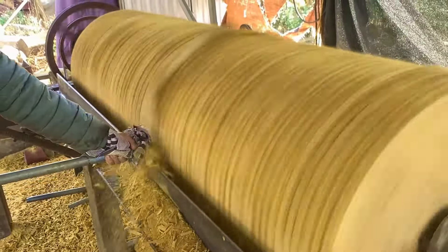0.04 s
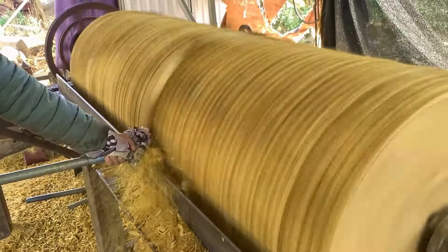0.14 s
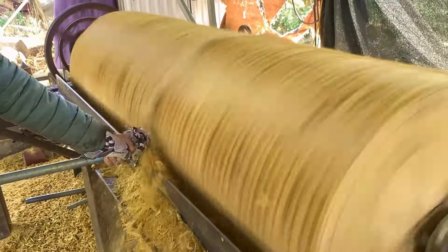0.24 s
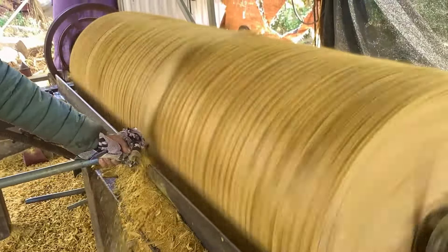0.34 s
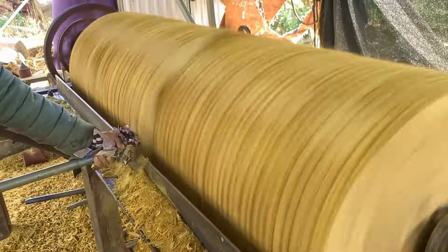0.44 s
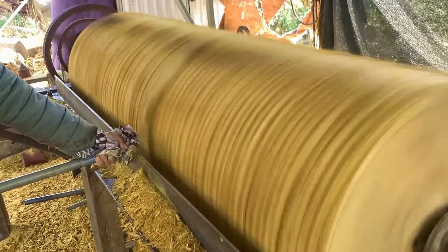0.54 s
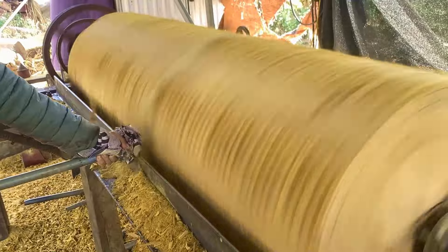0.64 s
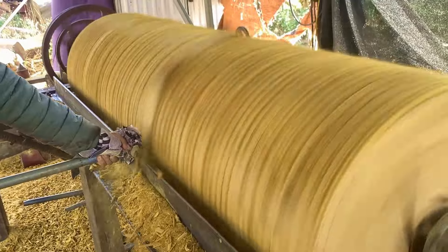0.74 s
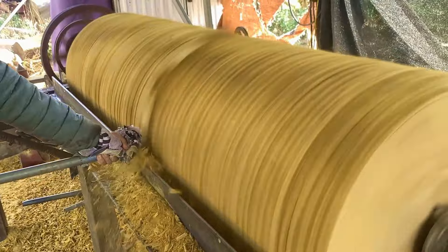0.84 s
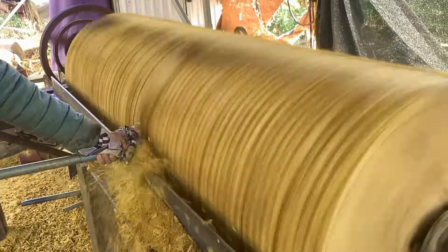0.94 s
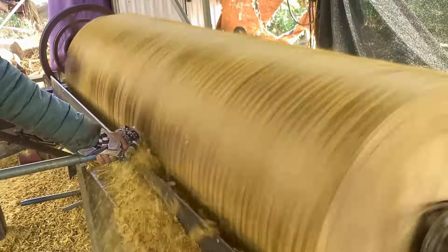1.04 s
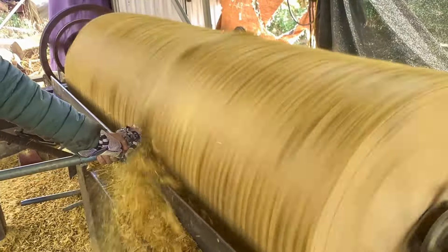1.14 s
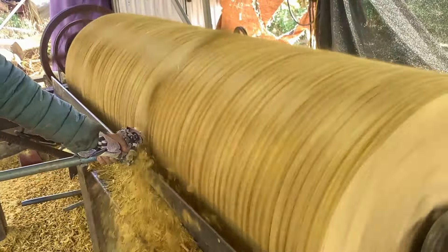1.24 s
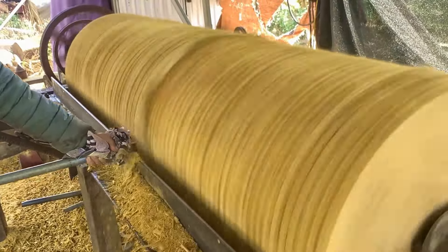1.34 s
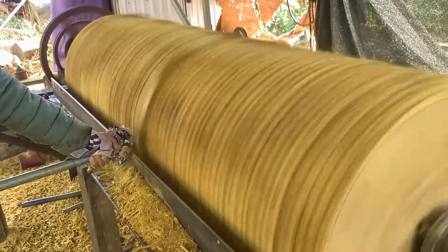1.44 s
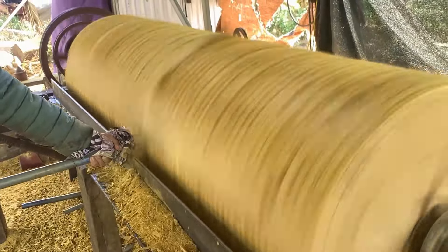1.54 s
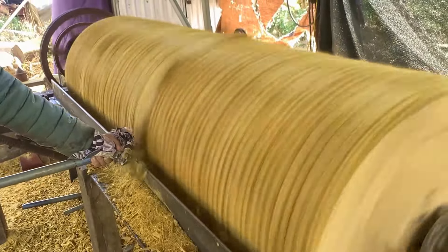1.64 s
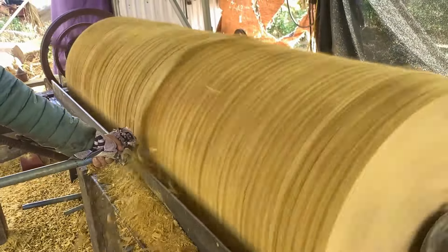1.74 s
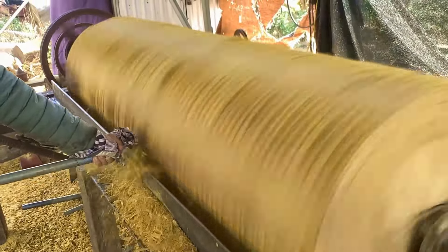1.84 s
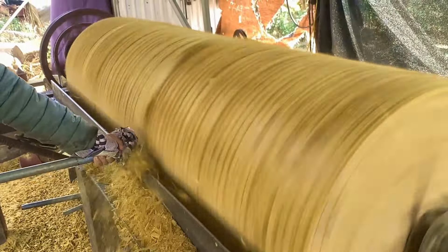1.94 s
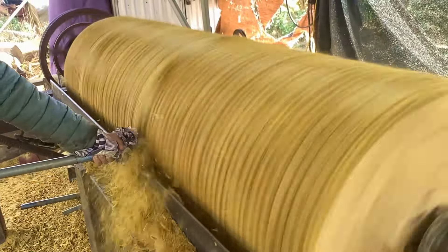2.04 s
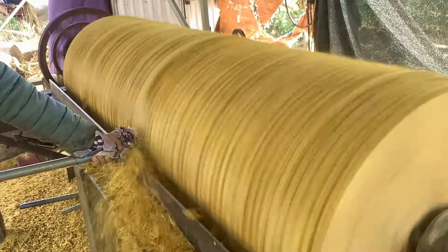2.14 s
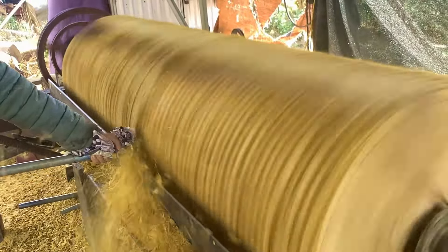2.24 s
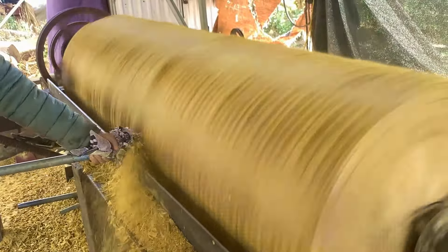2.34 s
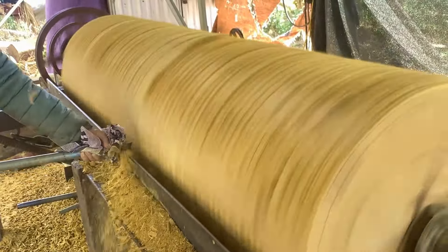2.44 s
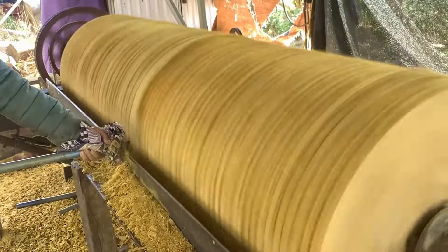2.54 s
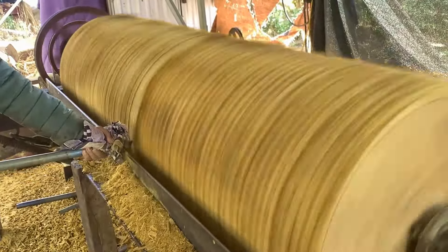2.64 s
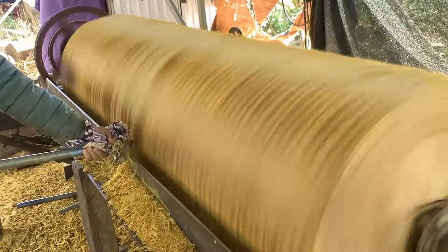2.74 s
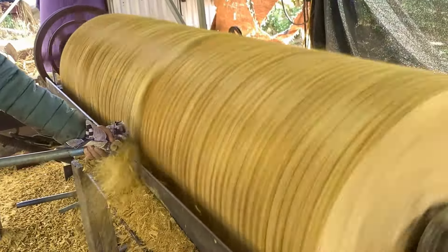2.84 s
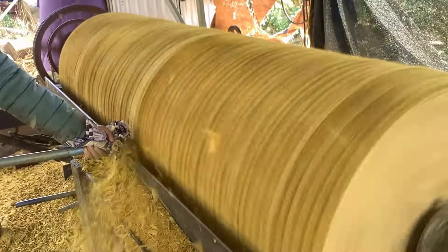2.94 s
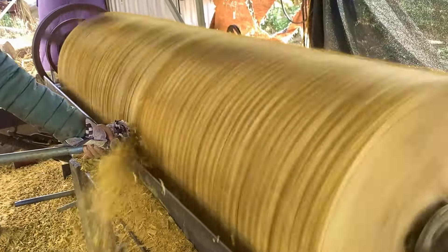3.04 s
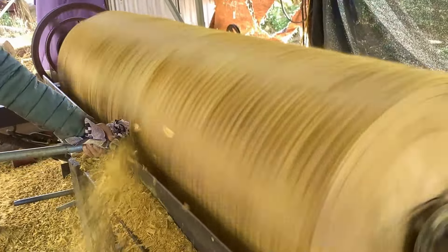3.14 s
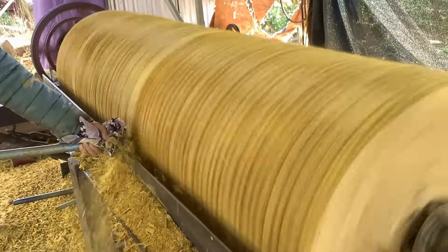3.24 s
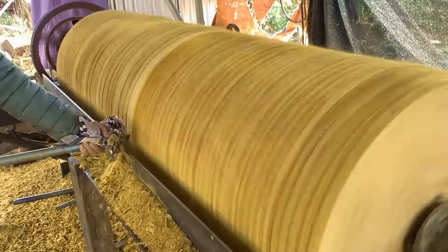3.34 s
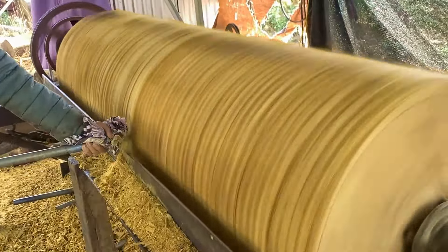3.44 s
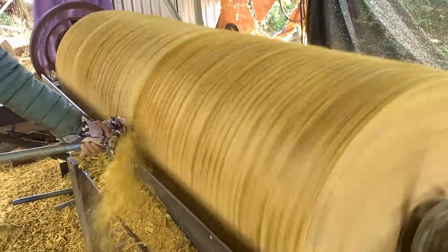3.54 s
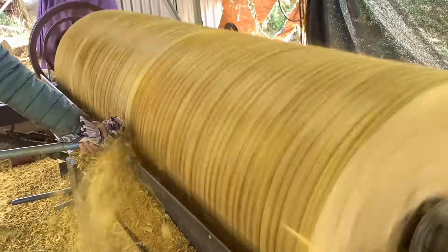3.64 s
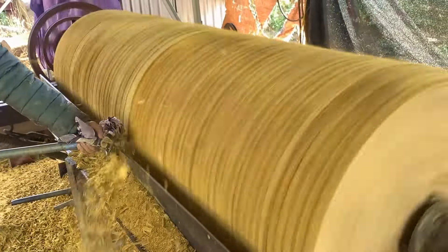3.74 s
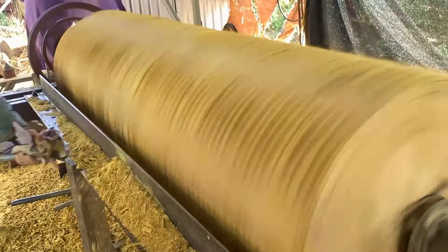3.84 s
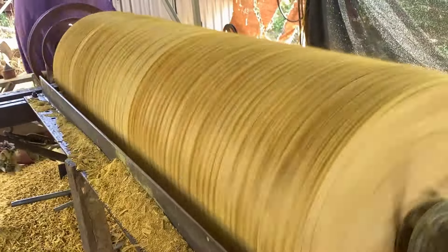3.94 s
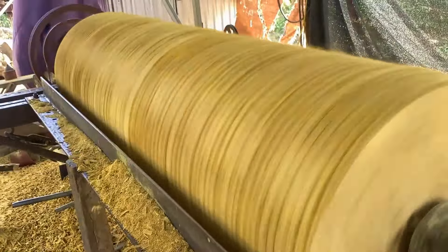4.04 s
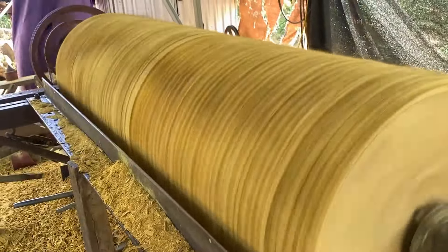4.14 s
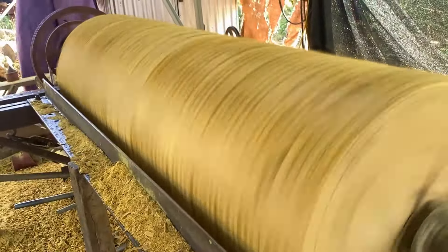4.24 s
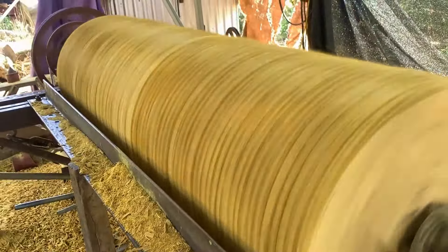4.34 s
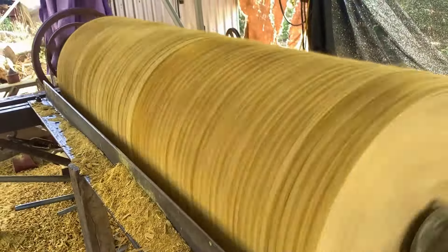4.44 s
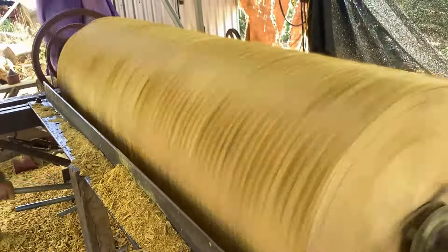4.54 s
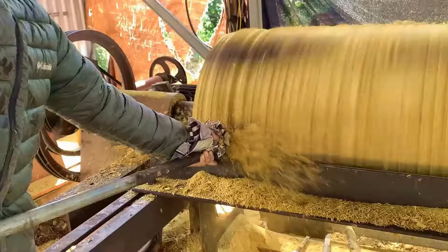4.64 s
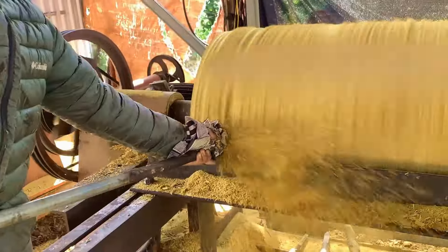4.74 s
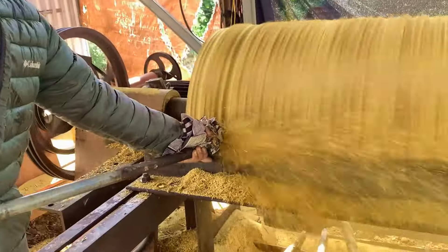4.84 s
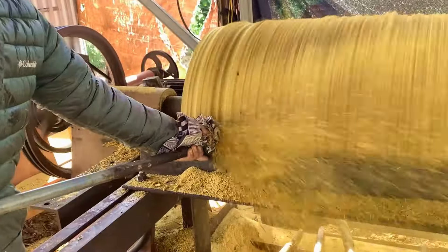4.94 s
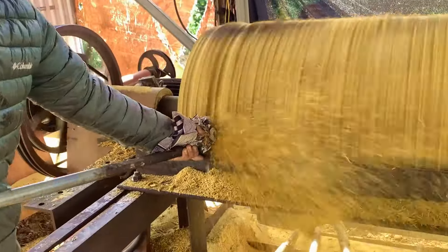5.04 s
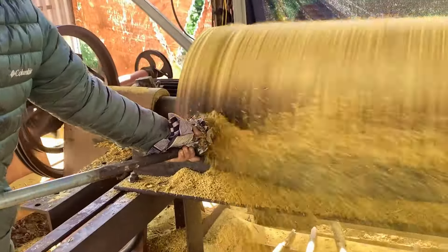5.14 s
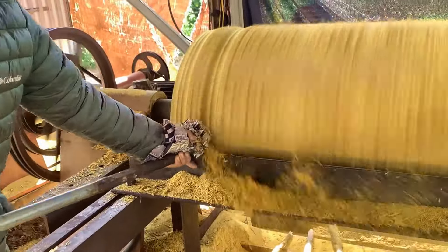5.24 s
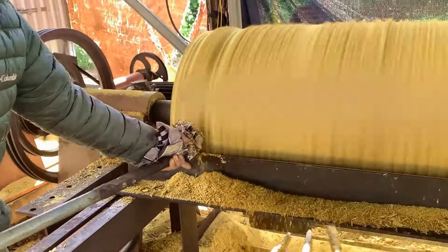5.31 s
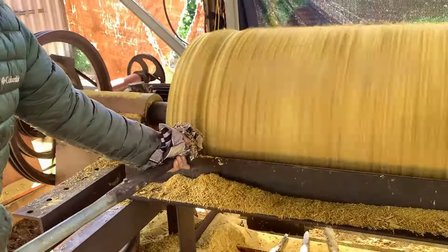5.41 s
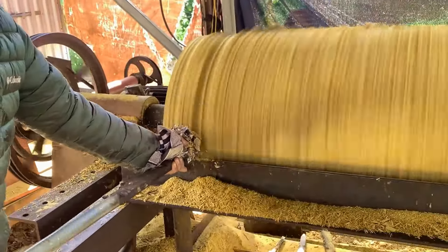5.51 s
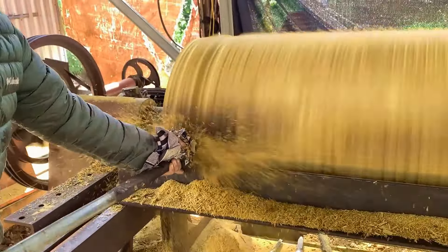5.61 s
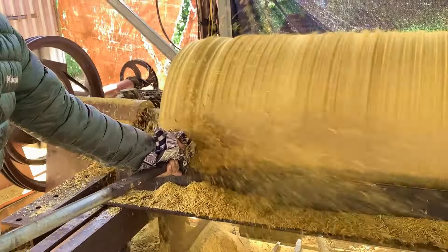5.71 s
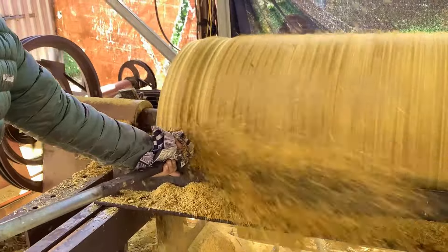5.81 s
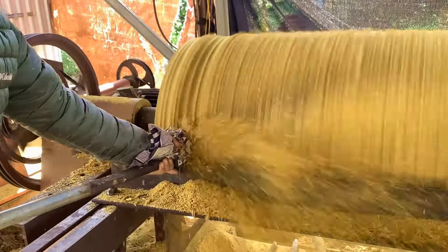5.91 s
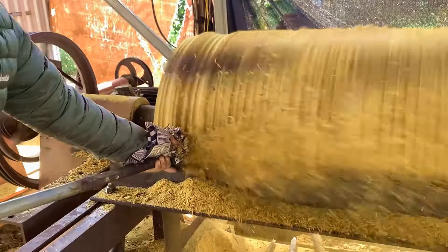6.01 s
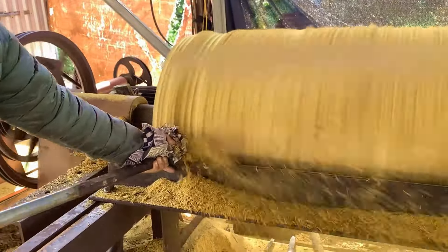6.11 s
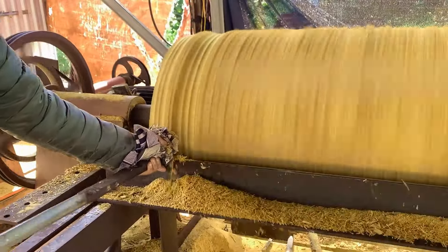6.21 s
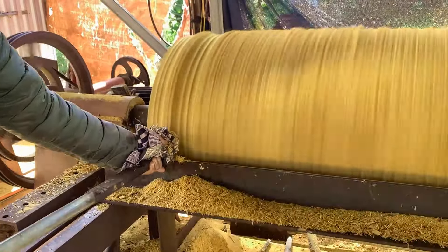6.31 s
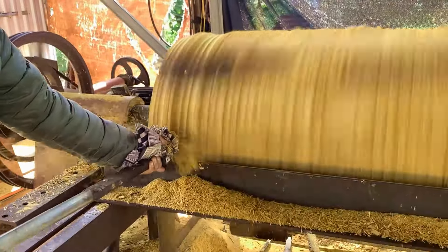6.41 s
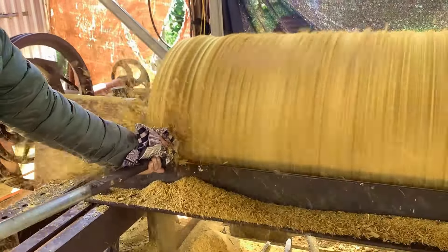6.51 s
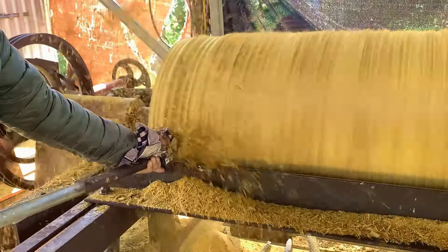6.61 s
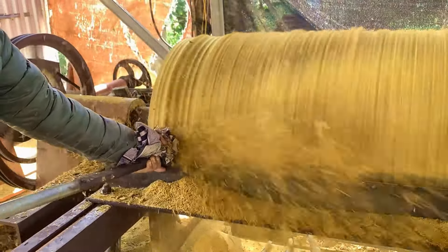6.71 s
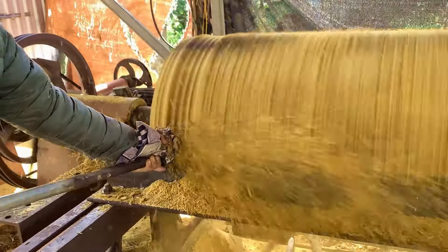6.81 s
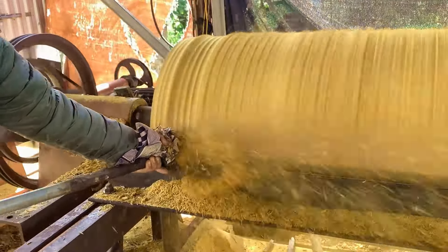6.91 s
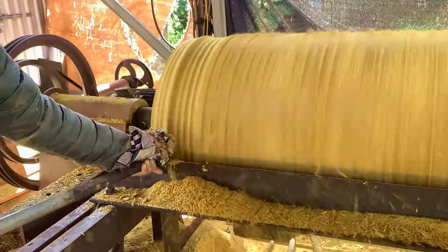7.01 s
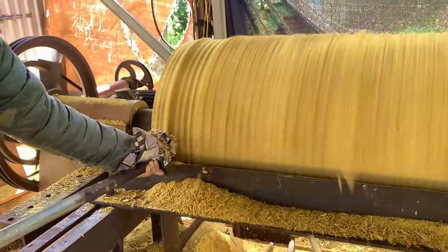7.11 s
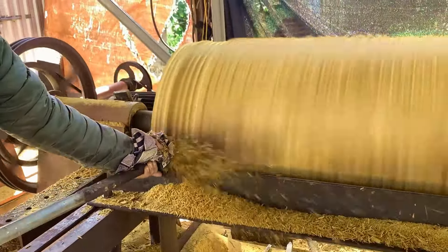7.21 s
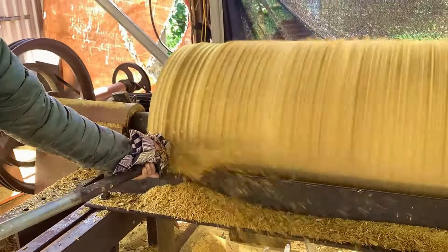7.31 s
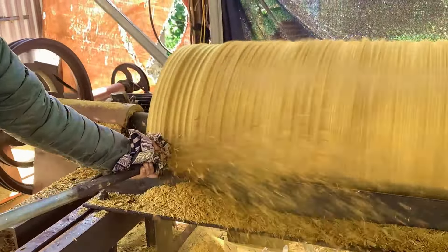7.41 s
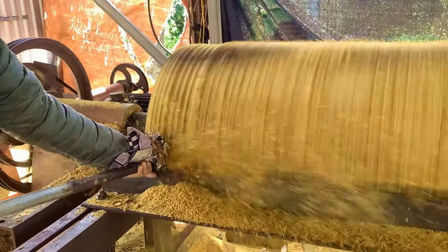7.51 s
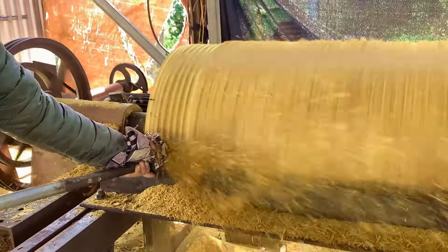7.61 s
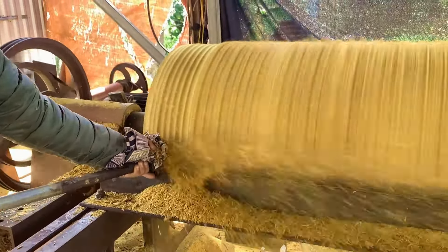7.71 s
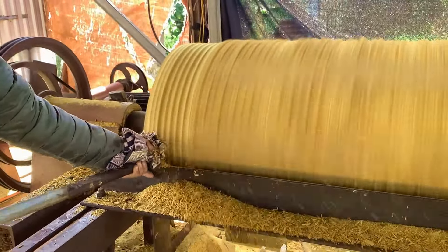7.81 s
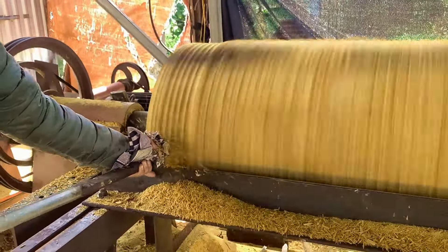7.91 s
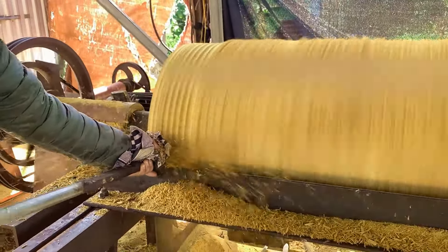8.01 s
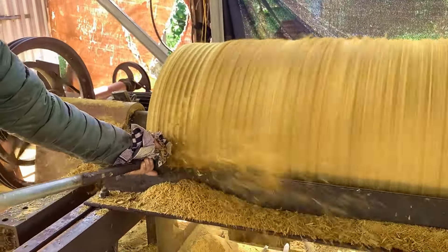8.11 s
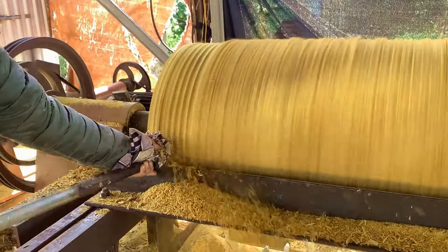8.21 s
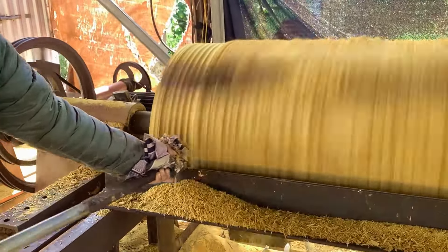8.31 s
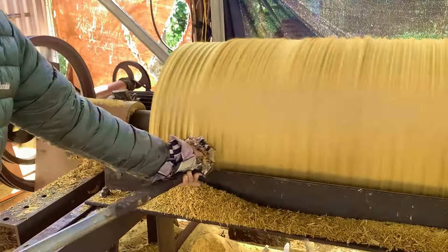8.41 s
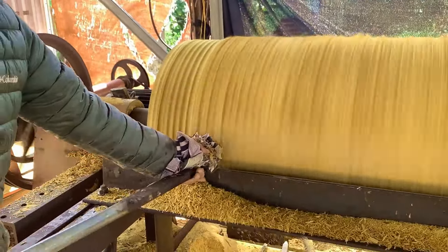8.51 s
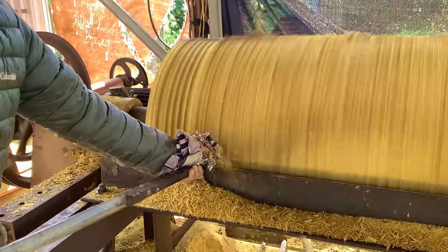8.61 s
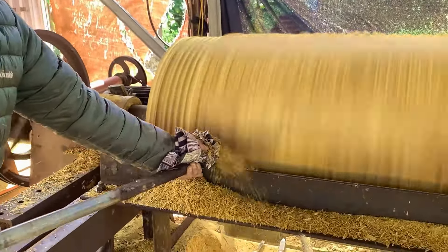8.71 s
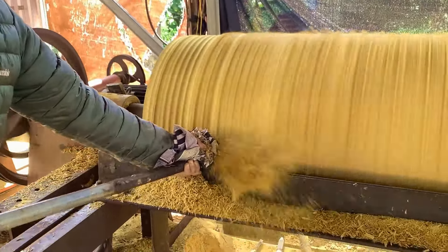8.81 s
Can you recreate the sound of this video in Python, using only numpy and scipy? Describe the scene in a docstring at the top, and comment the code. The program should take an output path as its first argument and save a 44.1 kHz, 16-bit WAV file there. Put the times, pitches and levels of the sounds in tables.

```python
"""Log on a lathe

A big log turns in an open shed while a hand-held tool is pushed against it in repeated rasping passes.
Random fibre snaps, scaled by each push, drive resonances of tool, rest and bed; noise and tones make the lathe.
It is heard from the end of the log, then abruptly from its side, where a high spot knocks once a turn."""
import sys
import numpy as np
from scipy import signal
from scipy.fft import rfft, irfft
from scipy.io import wavfile

SR = 44100
rng = np.random.default_rng(int(sys.argv[2]) if len(sys.argv) > 2 else 0)


def bounce(signal):
    """Save signal as a 16-bit WAV file at the path given by the first command-line argument."""
    frames = np.transpose(np.atleast_2d(signal))
    limited = np.clip(frames, -1, 1)
    pcm = np.round(limited * 32767).astype(np.int16)
    wavfile.write(sys.argv[1], SR, pcm)


N = 390726

VIEW_CHANGE_S = 4.725
TAPS = 16384
HZ = np.maximum(np.fft.rfftfreq(TAPS, 1 / SR), 1)
TIME = np.arange(N) / SR


def from_db(db):
    """Amplitude ratio of a level in dB."""
    return 10 ** (np.asarray(db) / 20)


def rms_one(x):
    """Scale to unit RMS."""
    return x / np.sqrt(np.mean(x ** 2) + 1e-20)


def in_hz(rows):
    """Each column of a spectrum, interpolated over log frequency."""
    hz, *columns = np.transpose(rows)
    return np.array([np.interp(np.log(HZ), np.log(hz), column) for column in columns])


def drift(knots_per_s):
    """Random polyline with unit RMS."""
    knots = rng.standard_normal(20000)
    return rms_one(np.interp(TIME * knots_per_s, np.arange(len(knots)), knots))


def through(x, response):
    """Convolve with an impulse response, keeping the length."""
    return signal.oaconvolve(x, response)[:N]


def causal(gain):
    """Minimum-phase impulse response of a gain: it rings only after the blow."""
    cepstrum = irfft(np.log(gain + 1e-7))
    cepstrum[1:TAPS // 2] *= 2
    cepstrum[TAPS // 2 + 1:] = 0
    return irfft(np.exp(rfft(cepstrum)))[:TAPS // 2]


def one_pole(x, time_constant_s, state=0):
    """Exponential smoothing, started from a filter state."""
    keep = np.exp(-1 / (time_constant_s * SR))
    return signal.lfilter([1 - keep], [1, -keep], x, zi=[state])[0]


def pushes(from_side):
    """Judder, rasp, hiss and fizz of one view's passes: pressure climbs, swells in an arch and drops away."""
    # Pushes of the tool. Each row: full contact in s, let go in s, attack in s, relative rasp level in dB,
    # swell of the middle over the ends in dB, pressure growth and brightening from middle to end in dB,
    # then judder, hiss and fizz (finest dust) relative to the rasp in dB.
    passes = [(0.006, 0.113, 0.043, -41.5, 2.5, -2, 5.5, -4, -7.5, 2.5),
              (0.097, 0.391, 0.019, -34, 0, -0.5, 1.5, -9, -4, 3.5),
              (0.705, 1.353, 0.015, -30, 6, -2, 3, -5.5, -3.5, 4.5),
              (1.705, 2.482, 0.26, -32, 6, 0, 4, -7.5, -3.5, 5.5),
              (2.901, 3.013, 0.25, -36.5, 4.5, 2, -2.5, -9, -0.5, 5.5),
              (3.1, 3.331, 0.13, -35, 1, -1.0, -1.5, -11.5, -1.5, 8),
              (3.481, 3.672, 0.035, -48, 4.5, 9.5, 0, -6, 6, 14),
              (3.68, 3.8, 0.063, -30, -0.5, -2.5, 1.5, -14.5, -1, 3),
              (4.713, 5.312, 0.037, -29.5, 8, -2.5, -0.5, -2, 3.0, -2),
              (5.595, 6.175, 0.12, -30.5, 5.5, -2, 1.0, -5.5, 3, -3.0),
              (6.452, 7.019, 0.1, -29.5, 5.5, -2.5, 0.5, -7.5, 2.5, -3),
              (7.228, 7.82, 0.03, -31.5, 6.5, 3, -3.5, -13, 2.5, -2.5),
              (7.953, 8.295, 0.032, -32.5, 6.5, 1.5, -3, -13.0, 0.5, -3.5),
              (8.673, 8.875, 0.1, -35.5, 4, 3, -2, -5.5, -0.5, -5)]
    # Judder, rasp, hiss and fizz in dB per dB of pressure: treble needs a firm push.
    follows_pressure = [.94, 1, 1.3, 1.45]
    follows = np.c_[follows_pressure]
    attack_rise_db, release_db_per_s = 38.5, 349  # of pressure; the rise is per attack time
    # faint ringing after let-go: judder, rasp, hiss and fizz against the end of the pass
    ring_on_db, ring_on_db_per_s = np.c_[[-11, -18.5, -26, -28]], 125
    power = np.zeros((4, N))
    for start, end, attack_s, rasp_db, swell_db, growth_db, brighten_db, judder_db, hiss_db, fizz_db in passes:
        if (end > VIEW_CHANGE_S) != from_side:
            continue
        near = slice(max(int((start - 2 * attack_s) * SR), 0), int((end + .3) * SR))
        t = TIME[near]
        along = np.clip(2 * (t - start) / (end - start) - 1, -1, 1)  # -1 at contact, 1 at let-go
        before, after = np.maximum(start - t, 0), np.maximum(t - end, 0)
        pressure_db = growth_db * along - swell_db * along ** 2
        pressure_db = pressure_db - attack_rise_db * before / attack_s
        colour_db = np.c_[[judder_db, 0, hiss_db, fizz_db]] + np.c_[[-1, 0, 1, 1]] * brighten_db * along
        drop_db = -follows * release_db_per_s * after
        release_db = np.maximum(drop_db, ring_on_db - ring_on_db_per_s * after)
        power[:, near] += from_db(rasp_db + colour_db + follows * pressure_db + release_db) ** 2
    tremble_db = 2.47 * drift(16)  # of the hand
    return np.sqrt(power) * from_db(tremble_db)


def jolt(age, rise_s, fall_s):
    """A force that swells and dies exponentially, peaking at 1 at age 0."""
    return np.exp(np.minimum(age / rise_s, -age / fall_s))


def catches():
    """Force of brief catches, as rasp and hiss: the tool scratches lightly when put on, or digs in."""
    # Single catches. Each row: peak time in s, relative rasp level in dB, relative hiss level in dB, fall in s.
    catch_rows = [(0.004, -26.5, -19, .01), (0.108, -31, -20, .021), (0.565, -45, -46.5, .035),
                  (0.627, -42, -46, .027), (0.66, -41.5, -45, .016), (0.727, -27.5, -35, .028),
                  (1.03, -26, -23, .012), (1.522, -47, -50.5, .012), (1.56, -45, -51, .011),
                  (1.623, -42.5, -47, .018), (1.68, -44, -43, .015), (2.76, -59.5, -60.5, .03),
                  (2.967, -29, -21.5, 0.028), (3.275, -48, -27, .021), (4.846, -30, -23, .007),
                  (5.169, -28, -15.5, .011), (5.828, -35, -23, .006), (6.392, -42, -48, .025),
                  (7.483, -23, -17, .006), (7.963, -25.5, -41, .008), (8.197, -24.5, -32, .011),
                  (8.588, -45.5, -48, .015)]
    force = np.zeros((2, N))
    for s, rasp_db, hiss_db, fall_s in catch_rows:
        near = slice(max(int((s - .02) * SR), 0), int((s + .15) * SR))
        force[:, near] += from_db([[rasp_db], [hiss_db]]) * jolt(TIME[near] - s, .003, fall_s)
    return force


def high_spot():
    """One jolt on every turn of the log, each a little different in strength."""
    # Log speed, overall rising as the passes go on. Each row: first knock in s, length of a turn in s.
    turns = [(4.769, .0806), (5.57, .0806), (6.528, .081), (7.25, .0792), (7.963, .0785), (8.666, .078)]
    age = np.ones(N)
    for first_s, turn_s in turns:
        since = TIME - first_s + turn_s / 2
        age = np.where(since > 0, since % turn_s - turn_s / 2, age)
    return jolt(age, rise_s=.0025, fall_s=.0075) * from_db(.5 * drift(14))


def fibres(per_s, spread_db, clump_db, clump_rate):
    """Centre and flank fibres snap at random, in uneven sizes and in clumps as shavings break off."""
    snaps = (rng.random((2, N)) < per_s / SR) * rng.choice([-1, 1], (2, N))
    sizes = from_db(spread_db * np.minimum(rng.exponential(1, (2, N)), 4))
    return rms_one(snaps * sizes * from_db(clump_db * drift(clump_rate)))


def end_cut(push):
    """A light, bright shaving cut on smooth wood."""
    # Broad colour of the cut from the end. Each row: frequency in Hz, relative mid and side gain in dB.
    end_colour = [(50, -43, -51), (90.5, -37, -39.5), (170, -29.5, -28), (485, -20.5, -25.5),
                  (1190, -16.5, -21), (2877, -8.5, -12.5), (3070, -14, -20.5), (4190, -13, -9),
                  (4750, -17.5, -18.5), (6410, -2, -9), (8550, -23.5, -10.5), (11980, -15, -14.5),
                  (12700, -19, -34), (15500, -26.5, -43)]
    # Resonances of tool, rest and bed. Each row: frequency in Hz, width in Hz, mid lift in dB, side lift in dB.
    end_modes = [(191.3, 17.6, 21, 7), (281, 25, 13.5, 7), (295.8, 7.8, 24, 3.5), (442, 65, 14.5, 7),
                 (744, 28, 13, 5.5), (1030, 58, 7.5, 4.5), (1460, 26, 9.5, 9), (1682, 71, 12, 6.5),
                 (2000, 9.8, 15.5, 10), (2484, 15, 15.5, 1), (2725, 8.2, 18, 17.5), (2904, 240, 8.5, -9.5),
                 (4076, 24, 14, 1), (5020, 23, 14, -4.5), (5563, 28, 22.5, 26.5), (7230, 210, 17, 9.5),
                 (7595, 25, 0.5, 8.5), (8398, 110, 25, 3.5), (8370, 36, 32, 2), (8610, 200, 28, 16.5),
                 (9580, 69, 23, 10.5), (10180, 78, 18, 14), (11500, 26, 10.5, -8.5), (11777, 440, -1, -6),
                 (14050, 650, 9, 23.5)]
    judder, rasp, hiss, fizz = push
    dig, spray = catches()
    levels = [np.hypot(from_db(-2.5) * judder, from_db(-8.5) * dig),
              np.hypot(from_db(0.4) * rasp, from_db(1.2) * dig),
              np.hypot(from_db(8.47) * hiss, from_db(3.2) * spray),
              np.hypot(from_db(3.25) * fizz, from_db(6) * spray)]
    grit = fibres(per_s=14000, spread_db=1.0, clump_db=1.0, clump_rate=450)
    body = body_gain(end_colour, end_modes)
    return gripped(cut(grit, levels, body, shed_db=-10, shed_t60=0.074, detour_s=.002, waver_db=1.43))


def side_cut(push):
    """A heavier, darker cut that a high spot jolts on every turn, the harder the more the tool is pressed."""
    # Broad colour of the cut from the side. Each row: frequency in Hz, relative mid and side gain in dB.
    side_colour = [(50, -35.5, -55), (99, -18, -21), (345, -1.5, -30), (484, -13, -13.5),
                   (1100, -11.5, -19.5), (1770, -8.5, -16.5), (2780, -1, -2.5), (4030, -7, -14.5),
                   (6000, -11, -2.5), (9200, -3.5, -7.5), (10500, -10, -7.5), (12700, -11.5, -17),
                   (13200, -8, -5.5), (15500, -17.5, -45)]
    # Resonances of tool, rest and bed. Each row: frequency in Hz, width in Hz, mid lift in dB, side lift in dB.
    side_modes = [(238, 33, 11.5, 5.5), (292, 37, 10, 14), (420, 28, 9, -7), (744.3, 21.7, 16, 10),
                  (875, 15, 12, 16.5), (1304, 9.6, 12, 19.5), (1313, 27, -7, 15), (1577, 180, 11, 11.5),
                  (2052, 47, 14.5, 13.5), (2271, 32, 12, -17), (2426, 16, 10, 0), (3600, 28, 7.5, 17),
                  (4560, 440, 4.5, 9.5), (4856, 23, 10.5, 0.5), (5400, 36, 14.5, -3), (5740, 160, 5.5, -12),
                  (5930, 64, 11.5, -5), (6350, 24, 14.5, -1), (6840, 300, 5, -6.5), (7640, 110, 6.5, 2),
                  (8310, 75, 9.5, -1), (8375, 23, -2, -8)]
    judder, rasp, hiss, fizz = push
    dig, spray = catches()
    turn = high_spot()
    slap = from_db(5.5) * rasp
    knock = np.hypot(turn * slap, from_db(-3.5) * dig)
    jolted_hiss = hiss * np.hypot(1, from_db(6.0) * turn)
    jolted_fizz = fizz * np.hypot(1, from_db(9) * turn)
    levels = [judder * np.hypot(1, from_db(7.0) * turn),
              np.hypot(from_db(-1.2) * rasp, from_db(3.4) * knock),
              np.hypot(from_db(2.93) * jolted_hiss, from_db(-0.5) * spray),
              np.hypot(from_db(3.1) * jolted_fizz, from_db(-3.5) * spray)]
    grit = fibres(per_s=10000, spread_db=1.5, clump_db=0.5, clump_rate=400)
    body = body_gain(side_colour, side_modes)
    out = cut(grit, levels, body, shed_db=-9, shed_t60=0.06, detour_s=0.0009, waver_db=1.1)
    out = out + thock(from_db(-6) * knock, body, centre_hz=808, octaves=0.18, ring_s=.008)
    return out + clack(knock, body, centre_hz=1510, octaves=0.9)


def cut(grit, levels, gain, shed_db, shed_t60, detour_s, waver_db):
    """The tearing force drives the heavy bed, the rest and the thin tool edge, each in its own range."""
    # Borders between judder, rasp, hiss and fizz. Each entry: frequency in Hz.
    range_edges_hz = [900, 4500, 7800]
    spray_share = .6  # power share of the shavings' spray in the side drive
    above = [1] + [1 / (1 + (edge / HZ) ** 10) for edge in range_edges_hz] + [0]
    shed, out = echoes(shed_t60), 0
    for low, high, level in zip(above, above[1:], levels):
        # grip and grain keep shifting the colour
        centre, flank = grit * level * from_db(waver_db * drift(45))
        mid = centre + from_db(shed_db) * through(centre, shed)
        mid = mid / np.hypot(1, from_db(shed_db))
        # log and bed scatter the cut sideways; spray widens it
        side = np.sqrt(1 - spray_share) * scatter(centre, detour_s) + np.sqrt(spray_share) * flank
        out = out + radiate(mid, side, gain * np.sqrt(np.abs(low - high)))
    return out


def gripped(x):
    """Fingers shift on the tool and change grip once, damping some of its rings and freeing others."""
    # Rings under the hand. Each row: frequency in Hz, width in Hz, mean lift before and after the regrip in dB.
    grip = [(1705, 140, -1.5, 1), (2720, 190, -1.5, -3.5), (4150, 140, -3, 4), (5570, 140, -2.5, -1.5),
            (6400, 1000, 0, -4.5), (10070, 190, 2.5, 5), (11250, 440, 4, -1)]
    regrip_s, waver_db, shifts_per_s = 2.65, 2, 9
    out = x
    for hz, width_hz, before_db, after_db in grip:
        lift_db = np.where(TIME < regrip_s, before_db, after_db) + waver_db * drift(shifts_per_s)
        ring = signal.lfilter(*signal.iirpeak(hz, hz / width_hz, fs=SR), x)
        out = out + (from_db(lift_db) - 1) * ring
    return out


def clack(force, body, centre_hz, octaves):
    """The high spot slaps the tool onto its rest: a woody clack, darker than the rasp."""
    mid, side = force * fibres(per_s=7900, spread_db=0.0, clump_db=2.0, clump_rate=700)
    return radiate(mid, side, body / np.sqrt(1 + (np.log2(HZ / centre_hz) / octaves) ** 4))


def thock(force, body, centre_hz, octaves, ring_s):
    """The tool rest answers each knock with a hollow ring that outlasts the blow."""
    return clack(one_pole(force, ring_s), body, centre_hz, octaves)


def body_gain(colour, modes):
    """Mid and side gain of a body: resonances standing on a broad colour."""
    lift = 0
    for hz, width_hz, mid_db, side_db in modes:
        peak = from_db([[mid_db], [side_db]]) ** 2 - 1
        lift = lift + peak / (1 + (2 * (HZ - hz) / width_hz) ** 2)
    return from_db(in_hz(colour)) * np.sqrt(np.maximum(1 + lift, .1))


def radiate(mid, side, gain):
    """Mid and side drive through a body to left and right, with the mid gain normalised to unit RMS."""
    gain = gain / np.sqrt(np.mean(gain[0] ** 2))
    mid, side = through(mid, causal(gain[0])), through(side, causal(gain[1]))
    return np.array([mid + side, mid - side])


def scatter(x, spread_s):
    """Short detours, differing with frequency, smear the phase and keep the colour."""
    delay_s = spread_s * (1 + np.tanh(np.interp(HZ / 250, np.arange(100), rng.standard_normal(100))))
    phase = 2 * np.pi * np.cumsum(delay_s) * SR / TAPS
    return through(x, irfft(np.exp(-1j * phase))[:TAPS // 2])


def echoes(t60):
    """A dense train of dying reflections with unit energy."""
    tail = rng.standard_normal(TAPS) * from_db(-60 * TIME[:TAPS] / t60)
    return tail / np.linalg.norm(tail)


def end_drive(push):
    """Drive hum and lathe rumble, from the end."""
    # Tones of the drive. Each row: frequency in Hz, relative level in dB.
    end_hum = [(264, -53.5), (300, -48.5), (452, -54.5)]
    # Broad colour of the idling lathe. Each row: frequency in Hz, relative mid and side gain in dB.
    end_idle_colour = [(50, -23.5, -36.5), (102.1, 5, -13.5), (254.4, -0.5, -15.5), (820, -7, -16.5),
                       (1300, -2, -9.5), (1746, -11.5, -15.5), (2100, -9.5, -13.5), (2660, -21, -26.5),
                       (4000, -21.5, -19.5), (6500, -27.5, -26), (10000, -33, -45), (15500, -42.5, -45.5)]
    # Whines of the drive. Each row: frequency in Hz, width in Hz, mid lift in dB, side lift in dB.
    end_whines = [(320, 9.1, 7.4, 11), (493, 14, 11.5, 13), (590, 22, 12, 5.3), (931, 11, 12.4, 9.9),
                  (1202, 5.16, 11, 16), (1826, 17, 10.5, 4), (2280, 3.3, 16.3, 17), (2443, 22, 7, 7.6),
                  (2860, 96, 6, 4)]
    hum = motor_hum(push, end_hum, lag_s=0.2, idle_db=-22, first_load=0.53)
    return hum + lathe(end_idle_colour, end_whines, level_db=-54.3, rattle_db=1.0)


def side_drive(push):
    """Drive hum and lathe rumble, from the side."""
    # Tones of the drive. Each row: frequency in Hz, relative level in dB.
    side_hum = [(243, -53.5), (300, -40.5)]
    # Broad colour of the idling lathe. Each row: frequency in Hz, relative mid and side gain in dB.
    side_idle_colour = [(50, -38, -36), (99, 3, -19), (250, -1, -17), (475, -3, -26), (850, -9.5, -26),
                        (1200, -4.5, -8.5), (1500, -9.5, -14.5), (2400, -15, -17), (3220, -24, -22.5),
                        (6000, -30.5, -32), (10000, -37, -39), (15500, -38, -44)]
    # Whines of the drive. Each row: frequency in Hz, width in Hz, mid lift in dB, side lift in dB.
    side_whines = [(301, 6.4, 7.9, 8), (443, 28, 1.2, 16), (624, 7.4, 10.7, -5), (626, 34, 2.4, -7),
                   (1125, 6.4, 13, 22.5), (1075, 12, 12.3, -1), (1115, 4.4, 4.5, 16.5), (2000, 16, 5, 6)]
    hum = motor_hum(push, side_hum, lag_s=0.17, idle_db=-34, first_load=0)
    return hum + lathe(side_idle_colour, side_whines, level_db=-46, rattle_db=1.5)


def motor_hum(push, tones, lag_s, idle_db, first_load):
    """The drive hums louder under load and takes a moment to settle after each pass."""
    drag = np.sqrt(push[0] * push[1])
    load = one_pole(np.sqrt(drag / drag.max()), lag_s, first_load)
    clock_s = np.cumsum(1 + 0.0038 * drift(15)) / SR  # speed wavers
    hum = 0
    for hz, db in tones:
        hum = hum + from_db(db + 1.5 * drift(12)) * np.sin(2 * np.pi * hz * clock_s)
    return (from_db(idle_db) + load) * hum


def lathe(colour, whines, level_db, rattle_db):
    """Belts and bearings rumble as coloured noise, rattling a little, with the drive's whines on top."""
    mid, side = rng.standard_normal((2, N)) * rms_one(from_db(rattle_db * drift(120)))
    return from_db(level_db) * radiate(mid, side, body_gain(colour, whines))


def bumps(thud_hz, level_db):
    """Dull bumps in the lathe frame: soft, heavily damped sine thuds."""
    # Frame bumps. Each row: centre in s, relative envelope peak in dB, half length in s.
    thuds = [(5.34, -28, 0.0078), (6.237, -22.5, 0.0046), (6.367, -25, 0.0034), (6.416, -29.5, 0.0083),
             (7.127, -18, 0.0035), (7.163, -26, 0.005)]
    out = np.zeros(N)
    for s, peak_db, half_length_s in thuds:
        age = TIME - s
        envelope = from_db(peak_db + level_db) * np.exp(-(age / half_length_s) ** 2)
        out += envelope * np.sin(2 * np.pi * thud_hz * age)
    return out


def scene():
    """Cut, lathe and hum, first from the end of the log and then from its side."""
    # Stereo lean. Each row: frequency in Hz, left minus right in dB.
    lean = [(60, 6.5), (110, -3), (200, -1), (380, -5), (700, -4), (1290, -1), (2380, -0.5), (4400, -1),
            (8120, -0.5), (15000, -3.0)]
    push = pushes(from_side=False)
    end = end_cut(push) + end_drive(push)
    push = pushes(from_side=True)
    side = side_cut(push) + side_drive(push) + bumps(thud_hz=186, level_db=-8)
    left, right = np.where(TIME < VIEW_CHANGE_S, end, side)
    half_lean_db = in_hz(lean)[0] / 2
    left = through(left, causal(from_db(half_lean_db)))
    right = through(right, causal(from_db(-half_lean_db)))
    return np.array([left, right])


def record(dry):
    """A steep elliptic low-pass cuts the top."""
    return signal.sosfilt(signal.ellip(12, .1, 80, 15750, fs=SR, output="sos"), dry)


dry = scene()
out = record(dry)
bounce(out)
```